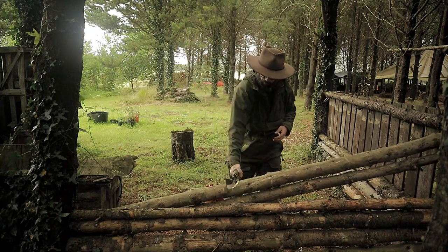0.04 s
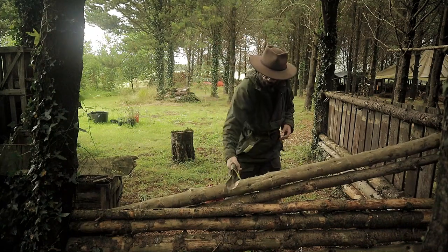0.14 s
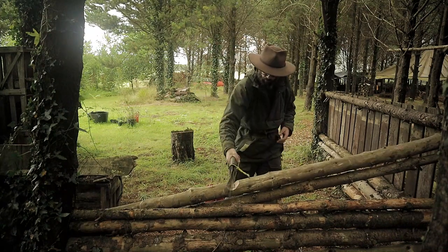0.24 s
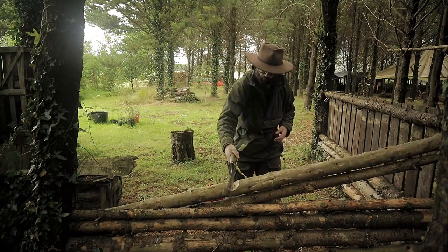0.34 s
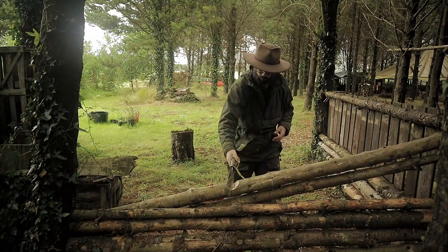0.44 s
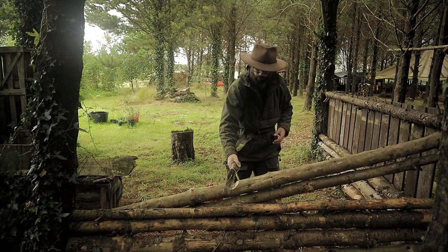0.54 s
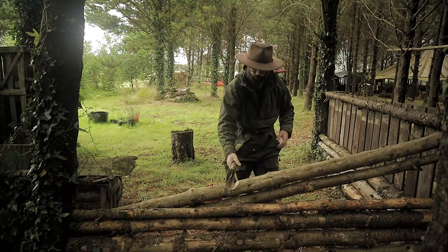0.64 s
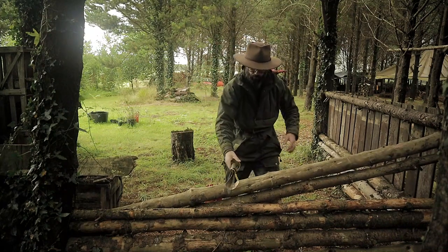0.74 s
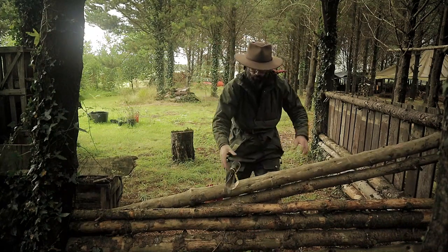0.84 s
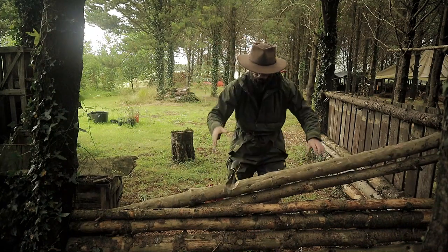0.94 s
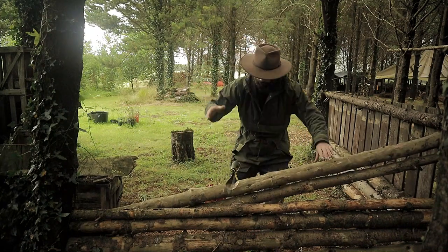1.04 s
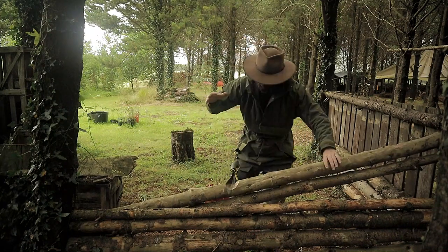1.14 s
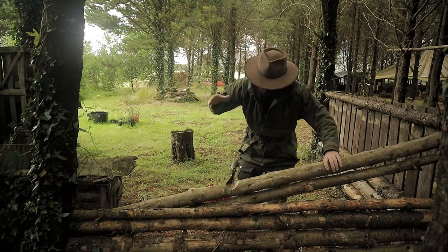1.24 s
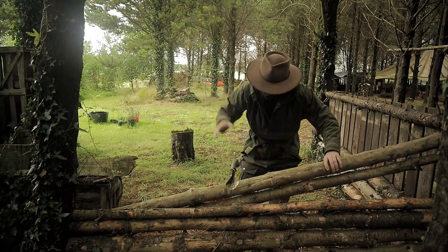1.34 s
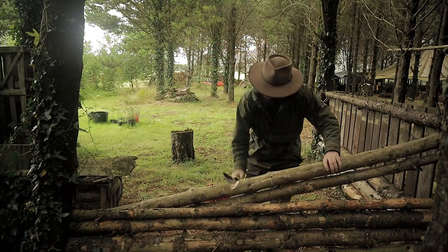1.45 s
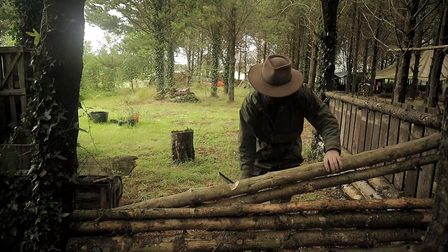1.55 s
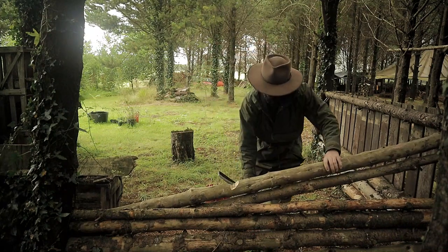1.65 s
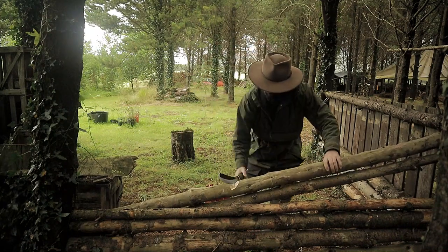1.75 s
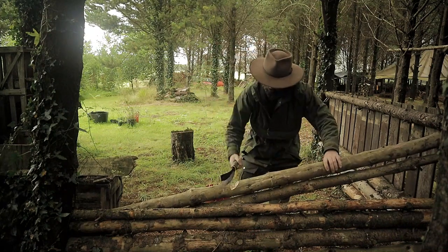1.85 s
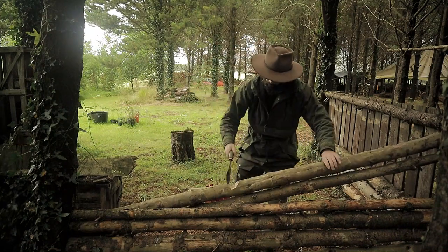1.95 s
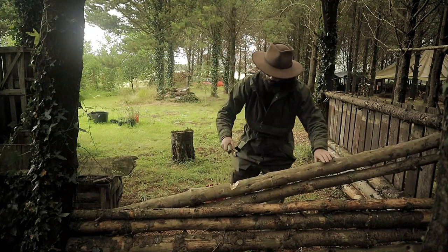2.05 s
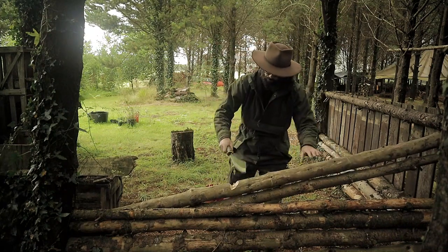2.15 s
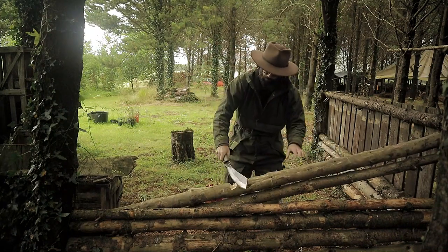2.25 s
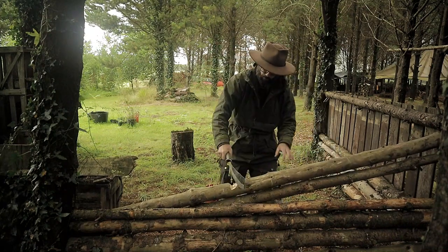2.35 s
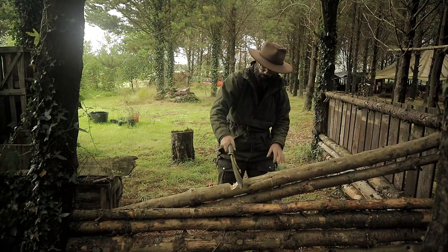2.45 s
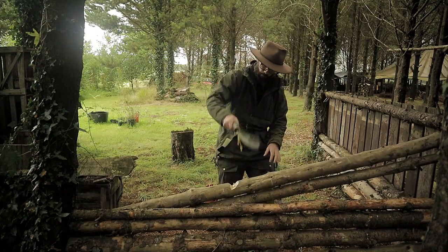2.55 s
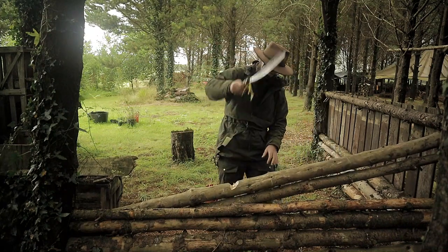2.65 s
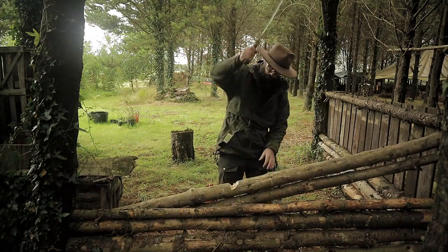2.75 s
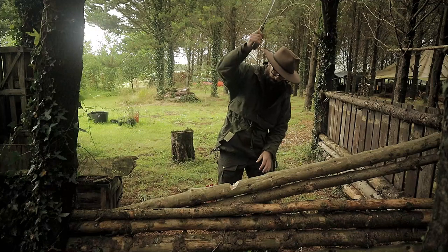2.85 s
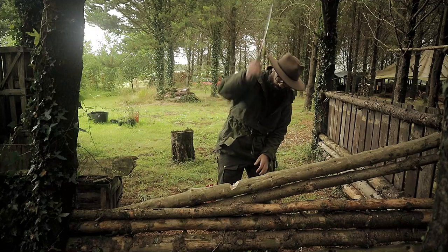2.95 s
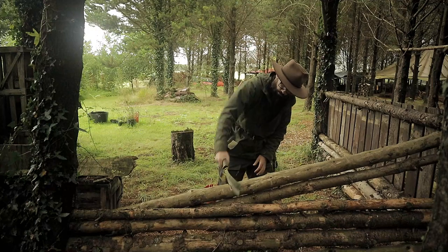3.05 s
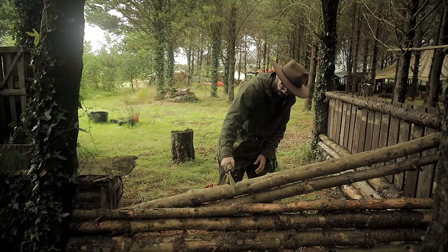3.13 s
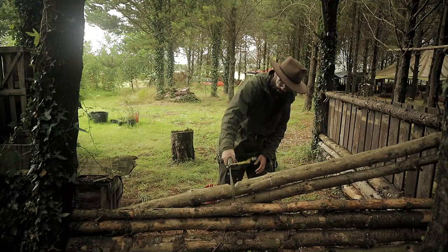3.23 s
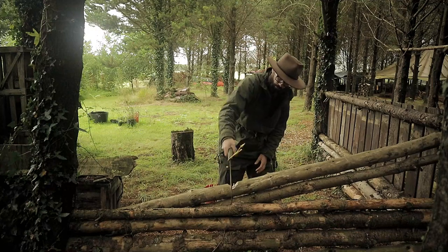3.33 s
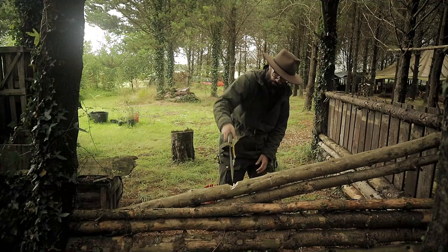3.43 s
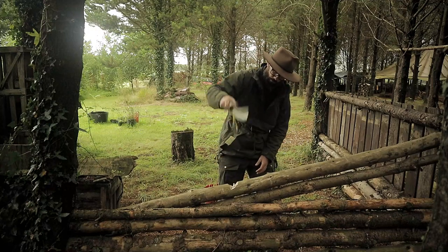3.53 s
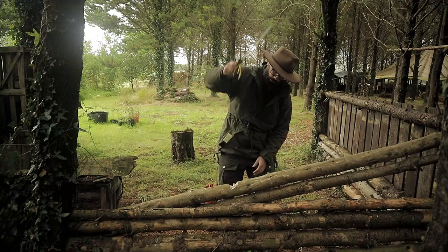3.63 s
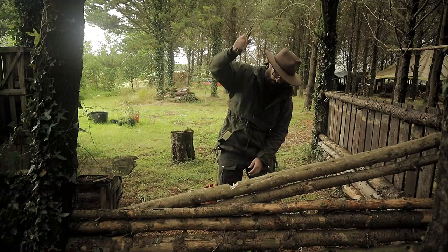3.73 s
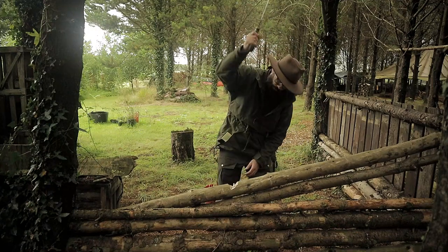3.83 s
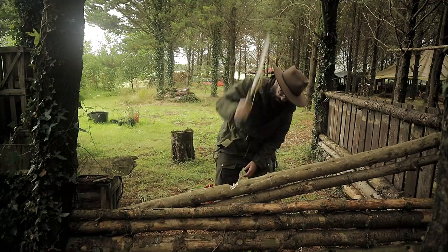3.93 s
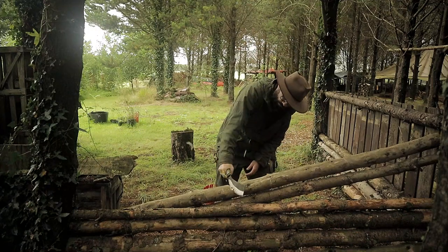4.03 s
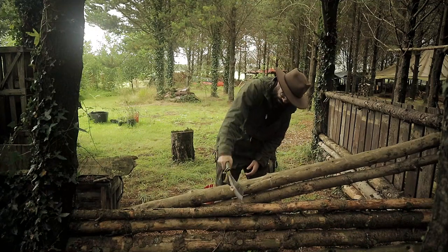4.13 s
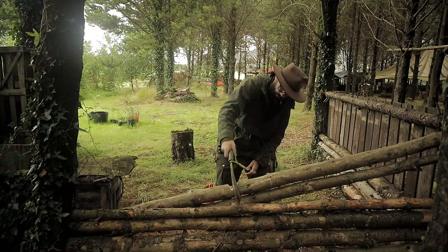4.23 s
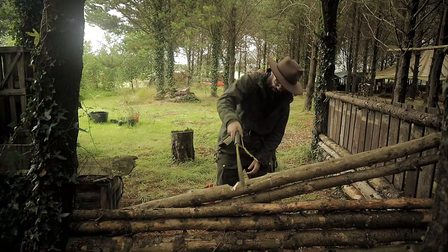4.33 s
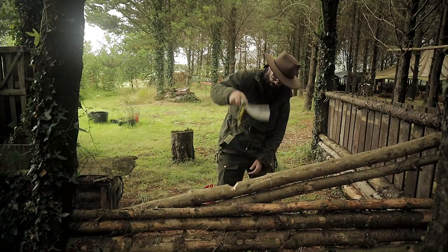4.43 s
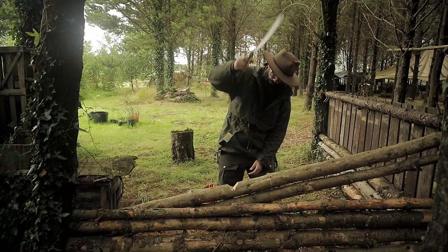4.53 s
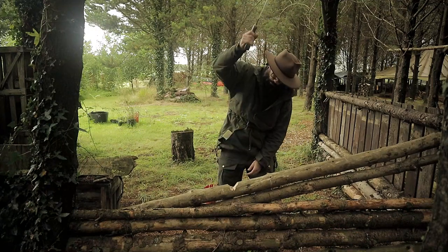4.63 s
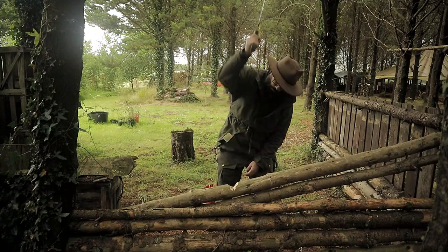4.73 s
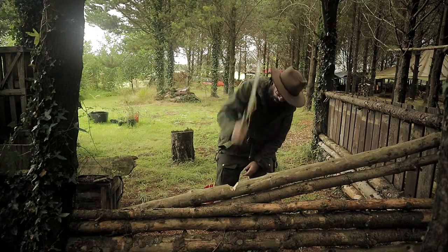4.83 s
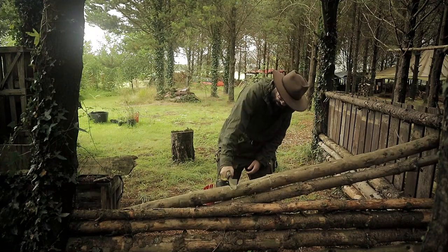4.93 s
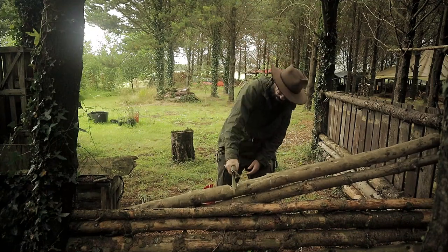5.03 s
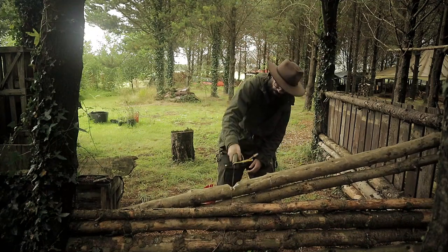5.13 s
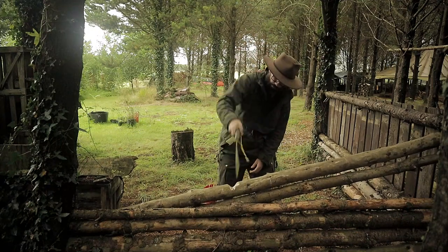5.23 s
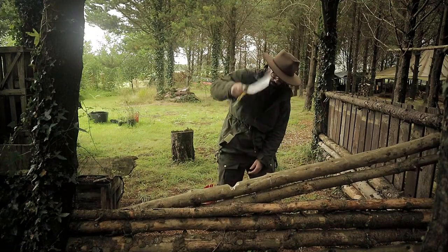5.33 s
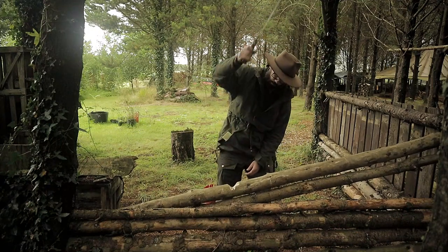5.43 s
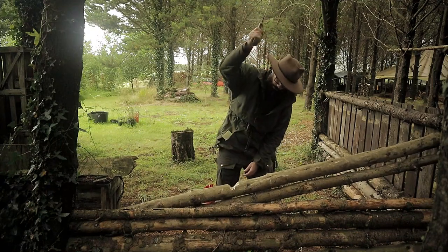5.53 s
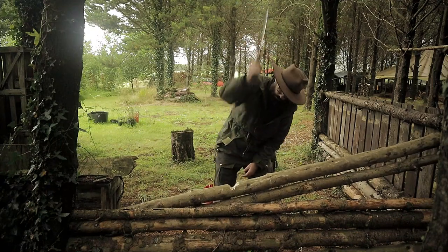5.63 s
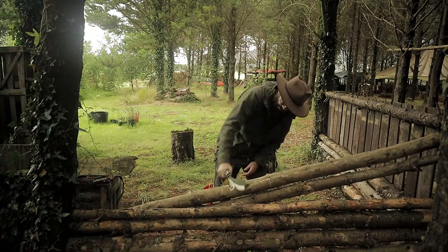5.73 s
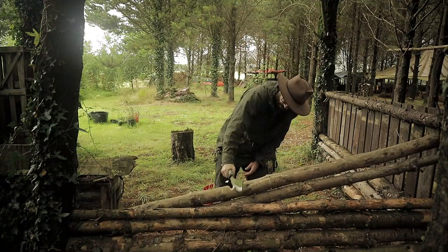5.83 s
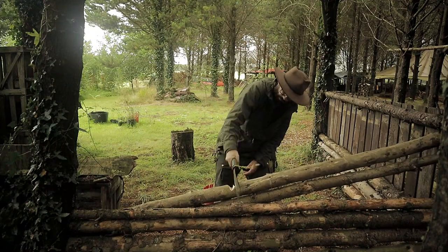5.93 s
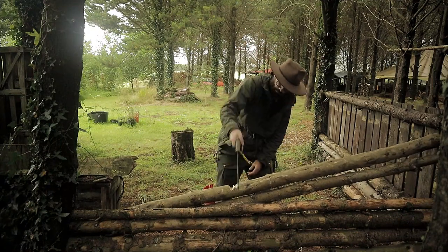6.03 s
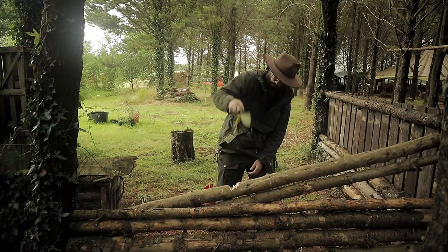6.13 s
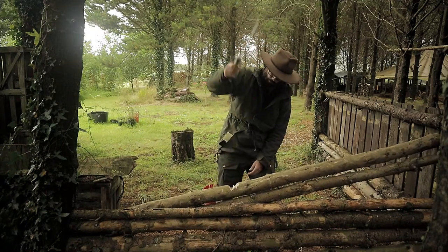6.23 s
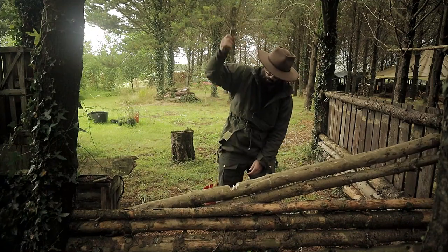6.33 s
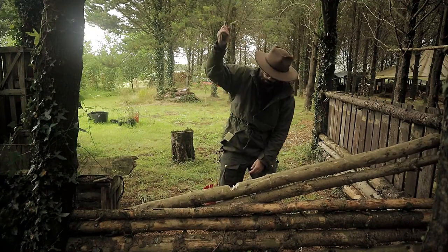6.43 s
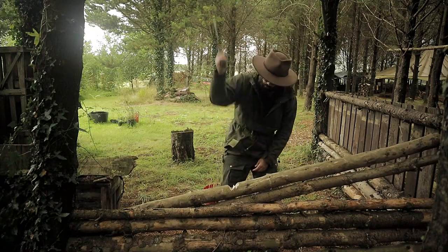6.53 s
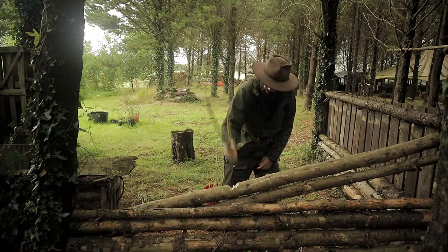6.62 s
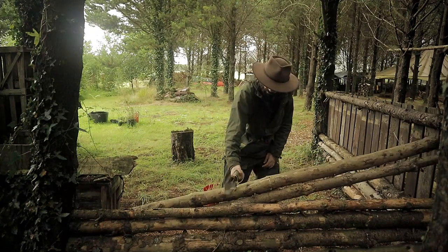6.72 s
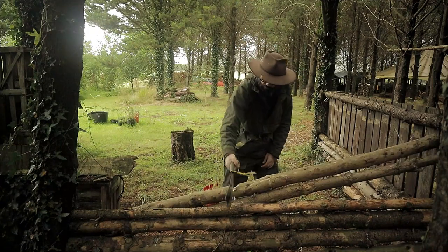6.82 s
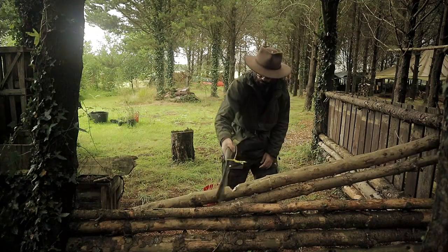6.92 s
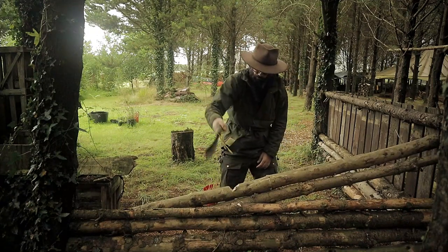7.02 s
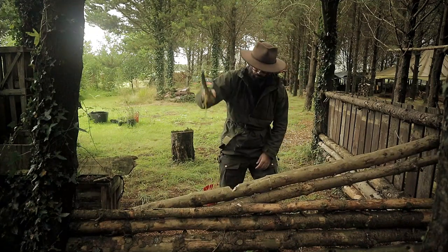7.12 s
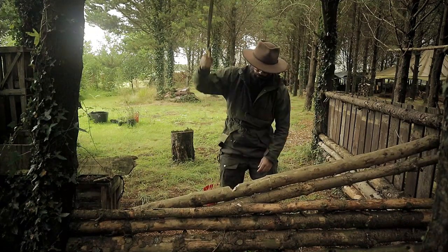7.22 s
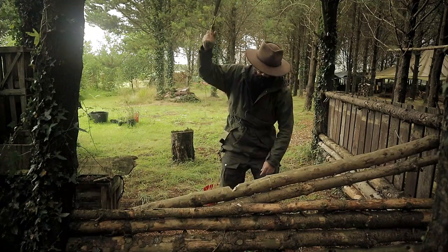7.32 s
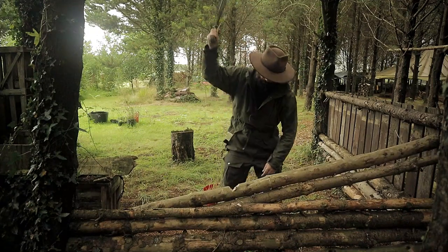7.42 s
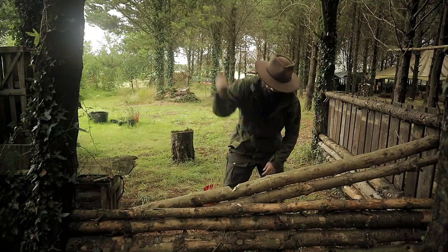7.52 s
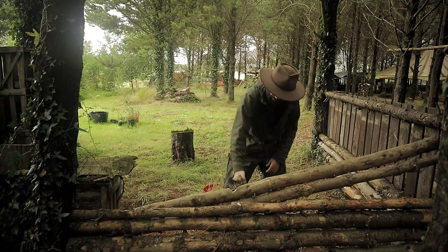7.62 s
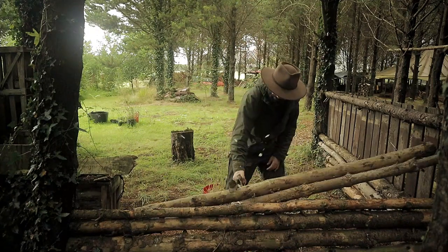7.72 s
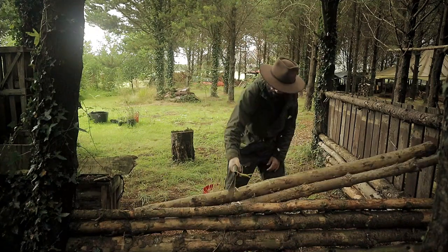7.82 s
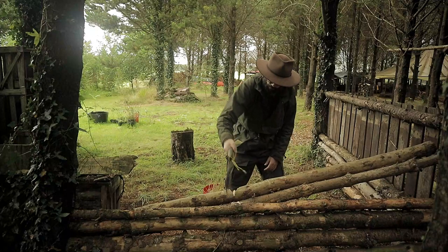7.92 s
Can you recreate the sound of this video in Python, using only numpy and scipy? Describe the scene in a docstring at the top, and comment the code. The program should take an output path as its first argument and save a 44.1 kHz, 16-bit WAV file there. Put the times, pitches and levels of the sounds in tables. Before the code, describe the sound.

Sharp, woody knife chops crack on a log fence in a quiet conifer clearing, with a short forest echo and faint distant birds.

```python
"""In a quiet clearing among conifers, a heavy knife chops seven times into a pole lying on a log fence.
Each blow sums noise bursts for the breaking fibres, damped modes for the ringing pole and blade, and a
low rumble and sway for the fence; echoes decaying band by band return it from the trunks, and strong
peaks clip at the microphone. Between blows light knocks excite the same pole, twigs and chips tick as
short noise bursts, steps press the ground, and small birds call far off as gliding sines over still air."""
import sys
import numpy as np
from scipy import signal
from scipy.fft import rfft, irfft, next_fast_len
from scipy.io import wavfile

SR = 44100
rng = np.random.default_rng(int(sys.argv[2]) if len(sys.argv) > 2 else 0)


def dump(signal):
    """Clip the signal to [-1, 1] and save it as 16-bit WAV at the path in sys.argv[1]."""
    limited = np.clip(np.atleast_2d(signal).T, -1, 1)
    pcm = np.round(limited * 32767).astype(np.int16)
    wavfile.write(sys.argv[1], SR, pcm)


N = 351477
AGE = np.arange(int(1.2 * SR)) / SR   # time since the onset of one sound, s

# The chops, levels relative to a usual blow. Each row: start in seconds, weight in dB, place along the
# notch from 0 (near) to 1 (far), splintering in dB, blade ring in dB, fence shudder in dB.
CHOP_BLOWS = [(0.1149, 3.5, 0.1, -7.5, -23.5, -1.5), (3.1506, 0.5, 0.25, -4.5, -21.5, 0),
              (4.0932, -3, 0.04, 1.5, -16.5, 3), (4.9755, 1.5, 0.93, 6, -15.5, 4),
              (5.8303, -4, .95, 7.5, -4.5, 4.5), (6.7496, 3, 0.21, -5.5, -27.5, 6.5),
              (7.7054, 2, 0.24, 1, -34, 4)]
# Spectrum of the dull crack of breaking fibres. Each row: frequency in Hz, relative density in dB per Hz.
CRACK_SPECTRUM = [(200, -13), (700, -7), (1300, -0.5), (2500, -3), (3600, -9), (5500, -20.5), (16000, -40)]
# Spectrum of the fine splintering. Each row: frequency in Hz, relative density in dB per Hz.
SPLINTER_SPECTRUM = [(500, -23.5), (2000, -11), (4400, 4), (6200, -8.5), (7500, 0), (9400, -2.5),
                     (12500, -11.5), (16000, -20.5)]
# Return from the trees. Each row: frequency in Hz, relative level in dB, early decay as t60 in seconds.
FOREST_ECHO = [(60, -44, .5), (300, -33, 0.28), (590, -23, 0.49), (1160, -19, 0.69), (2480, -23.5, 0.39),
               (4470, -27, 0.39), (8200, -33, 0.34), (11000, -39, 0.22), (16000, -52.5, .15)]


def from_db(db):
    """Level to amplitude: 20 dB is a factor of ten."""
    return 10 ** (np.asarray(db) / 20)


def fade(t60):
    """Exponential damping: the amplitude falls by 60 dB in t60 seconds."""
    return np.exp(-np.log(1000) * AGE / t60)


def add(track, s, sound):
    """Superposition: sounds starting at time s add linearly to the track."""
    start = int(round(s * SR))
    track[start:start + len(sound)] += sound[:max(N - start, 0)]


def at_hz(points, hz, axis=1):
    """Interpolation of one table column on a logarithmic frequency axis."""
    points = np.array(points)
    return np.interp(np.log(np.maximum(hz, 1)), np.log(points[:, 0]), points[:, axis])


def noise(spectrum, size=len(AGE)):
    """Spectral shaping: white noise is weighted by frequency and scaled to rms 1."""
    padded = next_fast_len(size)
    colour = from_db(at_hz(spectrum, np.fft.rfftfreq(padded, 1 / SR)))
    white = rng.standard_normal(padded)
    x = irfft(rfft(white) * colour, padded)[:size]
    return x / x.std()


def burst(spectrum, envelope):
    """Energy normalisation: a noise burst carries just the energy of its envelope."""
    x = noise(spectrum) * envelope
    return x * np.sqrt(np.sum(envelope ** 2) / np.sum(x ** 2))


def ring(hz, db, t60):
    """Modal vibration: one struck mode is an exponentially damped sine."""
    return from_db(db) * np.sin(2 * np.pi * hz * AGE) * fade(t60)


def pressed(x, contact_ms):
    """Contact time: a longer force pulse excites less treble, here a two-pole low-pass filter."""
    r = np.exp(-2 * np.pi / (contact_ms * 1e-3 * SR))
    return signal.lfilter([(1 - r) ** 2], [1, -2 * r, r * r], x)


def chops(shove_db=2.5, crack_db=-10, splinter_db=-4, tearing_db=-32, rebound_s=.0033, rebound_db=-4,
          shudder_db=-25.5, sway_db=3, settling_db=1.0):
    """Impact excitation: crack, shove, ring and fence start together, and the pole slaps the log below."""
    ring_follows = .58   # dB of wooden ring per dB of weight
    far_crack_db = 6   # more crack at the far end of the notch
    out = np.zeros(N)
    for blow, (s, weight, place, splinter, steel, fence) in enumerate(CHOP_BLOWS):
        wood = from_db(ring_follows * weight) * pole(place, detune=0.017, uneven_db=3.37)
        push = from_db(shove_db + weight) * shove(360, 0.013)

        crack = from_db(crack_db + far_crack_db * place)
        fibres = crack * burst(CRACK_SPECTRUM, bite(0.0033) + 0.17 * fade(0.033))
        tearing = from_db(splinter_db) * bite(0.0019) + from_db(tearing_db) * fade(0.055)
        fibres += from_db(splinter) * burst(SPLINTER_SPECTRUM, tearing)

        logs = from_db(shudder_db + fence) * shudder(0.015, .34)
        logs += from_db(sway_db - settling_db * blow) * sway()   # less sway with each blow
        add(out, s, pressed(wood + push, 0.3) + fibres + logs)

        slap = crack * burst(CRACK_SPECTRUM, bite(0.0034))
        add(out, s + rebound_s, from_db(rebound_db) * slap)
    return out


def bite(bite_s):
    """Fracture: fibres break while the edge sinks in, then stop quickly along a Gaussian."""
    onset = 1 - np.exp(-AGE / 0.00078)
    return onset * np.exp(-(AGE / bite_s) ** 2)


def pole(place, detune, uneven_db):
    """Modal excitation: the striking point weights the modes, each varied a little in pitch and level."""
    # Each row: nominal frequency in Hz, level struck mid-notch in relative dB, t60 in seconds,
    # dB gained from the near end of the notch to the far end.
    pole_modes = [(183, -26, 0.017, 4), (185, -21, 0.011, 2), (344, -20, 0.053, -1),
                  (334.6, -14.5, 0.083, -0.5), (457, -13.5, 0.063, -10), (504, -17, 0.12, -8.5),
                  (557, -21, 0.054, -4.5), (720, -11, 0.077, -8.5), (819.7, -14, 0.058, -11.5),
                  (972, -11, 0.091, 10), (1040, -17.5, .06, 0), (1204, -7, 0.033, -14),
                  (1446, -20, 0.095, 3.5), (1860, -15.5, 0.05, 7), (2226, -18, 0.055, 1.5),
                  (2660, -21, 0.018, 8), (3570, -23.5, 0.025, 5), (4440, -20.5, 0.032, 6)]
    out = 0
    for k, (hz, db, t60, far_db) in enumerate(pole_modes):
        pull, luck = rng.standard_normal(2)
        level_db = db + far_db * (place - .5) + uneven_db * luck
        out = out + (-1) ** k * ring(hz * (1 + detune * pull), level_db, t60)   # alternating polarity
    return out


def shove(push_hz, push_t60):
    """Damped oscillator: the pole is pushed aside and springs back in one heavy swing of pressure."""
    return ring(push_hz, 0, push_t60)


def shudder(rise_s, t60):
    """Energy spreading: the blow builds up in the stacked logs, which rumble against each other."""
    # Each row: frequency in Hz, relative density in dB per Hz.
    fence_spectrum = [(25, -13.5), (60, -3), (95, 3), (165, 1), (250, -5.5), (420, -8), (650, -21),
                      (1500, -42), (16000, -88)]
    build_up = (1 - np.exp(-AGE / rise_s)) ** 2
    return burst(fence_spectrum, build_up * fade(t60))


def sway():
    """Low-frequency resonance: the whole fence rocks in a few slow modes."""
    # Each row: frequency in Hz, relative level in dB, t60 in seconds.
    sway_modes = [(36, -45.5, 1.7), (60.8, -52, 2.6), (95, -43, 0.69), (166, -36.5, 0.5)]
    modes = sum(ring(*mode) for mode in sway_modes)
    return modes * (1 - np.exp(-AGE / 0.037))


def blade(shiver_db=-31.5, shiver_t60=0.38, tones_db=-26, swish_db=-53, swing_s=0.068):
    """Flow noise and plate modes: the blade swishes through the air and sings briefly as it lands."""
    # Dense cluster of close modes in thin steel. Each row: frequency in Hz, relative density in dB per Hz.
    shiver_spectrum = [(1000, -52), (4500, -28.5), (5100, 0), (5300, 0), (5800, -6.5), (6300, -17.5),
                       (7400, -14), (9000, -28), (16000, -50)]
    # Clearest tones of the steel. Each row: frequency in Hz, relative level in dB, t60 in seconds.
    steel_modes = [(4990, -3, 0.27), (5320, -3.5, 0.19), (5530, -6, 0.24), (5670, -8.5, 0.28),
                   (5630, -5.5, 0.31), (6940, -13, 0.43), (7670, -7.5, 0.17)]
    swish_spectrum = [(60, -10.0), (400, 0), (900, -4), (2000, -17.5), (16000, -44.5)]   # Hz, dB per Hz
    out = np.zeros(N)
    swish = np.exp((np.minimum(AGE, swing_s) - swing_s) / 0.057) * (AGE < swing_s)   # grows, then stops
    tones = from_db(tones_db) * sum(ring(*mode) for mode in steel_modes)
    for s, weight, place, splinter, steel, fence in CHOP_BLOWS:
        add(out, s - swing_s, from_db(swish_db) * swish * noise(swish_spectrum))
        shiver = from_db(shiver_db) * burst(shiver_spectrum, fade(shiver_t60))
        add(out, s, from_db(steel) * (tones + shiver))
    return out


def knocks(ring_db=-1, crack_db=5, splinter_db=6, shudder_db=-20, scrape_db=-15, sway_db=20,
           clink_hz=4300, clink_db=-11):
    """Light contact: blade and hand ring the same pole with little weight; the blade clinks and scrapes."""
    # Each row: start in seconds, relative level in dB, place along the notch from 0 to 1,
    # contact time in milliseconds, relative fence shudder in dB.
    touches = [(1.496, -28, 0.47, 0.55, -1), (1.504, -34.5, 0.6, 0.25, 13.5),
               (1.5307, -27, 0.8, 0.092, 12.5), (1.614, -32.5, 0.25, 0.46, 14),
               (1.642, -31, 0.53, 0.61, 15.5), (2.3104, -23.5, 0.9, 0.42, 3)]
    # a softer contact breaks fewer fibres: dB lost per ms of contact
    crack_loss_db_per_ms, splinter_loss_db_per_ms = 47, 67
    out = np.zeros(N)
    contact = bite(0.006) + from_db(scrape_db) * fade(0.187)
    for s, db, place, contact_ms, fence in touches:
        crack = crack_db - crack_loss_db_per_ms * contact_ms
        splinter = splinter_db - splinter_loss_db_per_ms * contact_ms
        wood = from_db(ring_db) * pole(place, detune=0.045, uneven_db=0.0)
        fibres = from_db(crack) * burst(CRACK_SPECTRUM, contact)
        fibres += from_db(splinter) * burst(SPLINTER_SPECTRUM, contact)
        rocking = from_db(sway_db) * sway() * fade(0.68)
        logs = from_db(shudder_db + fence) * (pressed(shudder(0.0038, 0.34), 3.2) + rocking)
        clink = ring(clink_hz, clink_db + crack, 0.088)
        add(out, s, from_db(db) * (pressed(wood, contact_ms) + fibres + logs + clink))
    return out


def litter(twig_db=-3, twig_t60=0.031, count=2):
    """Transient radiation: twigs and landing chips give short ticks, boots on soft ground dull thuds."""
    # Clearest twigs and chips. Each row: start in seconds, relative level in dB, treble against middle in dB.
    snaps = [(0.2123, -35.5, -12), (1.592, -44.5, -2.5), (3.2703, -42, -5), (3.5987, -44.5, -29),
             (4.4301, -52, -16.5), (4.5067, -51, -0.5), (4.6144, -44.5, -21), (4.6663, -47, -5),
             (5.5317, -46.5, -11.5), (7.2548, -46, -4), (7.7615, -26, -25), (7.7855, -28.5, -20.5)]
    # Middle of a snap. Each row: frequency in Hz, relative density in dB per Hz.
    twig_middle = [(300, -9), (1200, 7.5), (2500, 5.5), (4700, -1), (6500, -20), (16000, -21)]
    # Treble of a snap. Each row: frequency in Hz, relative density in dB per Hz.
    twig_treble = [(2000, -17), (5000, 0.5), (9000, -3), (16000, -18)]
    # Steps on the soft ground. Each row: start in seconds, relative level in dB.
    footfalls = [(0.612, -58.5), (1.96, -71), (5.29, -53), (7.24, -59.5)]
    # Spectrum of a step. Each row: frequency in Hz, relative density in dB per Hz.
    step_spectrum = [(30, 5.5), (150, 5.5), (300, -4.5), (600, -9.5), (1500, -24.5), (16000, -48)]
    # small chips land a little after every chop: mean flight and its standard deviation, then relative levels
    flight_s, spread_s, chip_db, chip_treble_db = 0.4, 0.044, -54.5, -6
    out = np.zeros(N)
    chips = []
    for s, *_ in CHOP_BLOWS:
        for late in rng.standard_normal(count):
            chips.append((s + flight_s + spread_s * late, chip_db, chip_treble_db))
    snap = fade(twig_t60)
    for s, db, treble in list(snaps) + chips:
        tick = burst(twig_middle, snap) + from_db(treble) * burst(twig_treble, snap)
        add(out, s, from_db(db + twig_db) * tick)
    press = AGE / 0.0046 * np.exp(1 - AGE / 0.014)
    for s, db in footfalls:
        add(out, s, from_db(db) * burst(step_spectrum, press))
    return out


def echoes(table, delay_s, build_s, tint=None, linger=0.19):
    """Diffuse reverberation: dense echoes build up after a delay and decay by band, the last half as fast."""
    edges = np.geomspace(40, 18000, 17)
    onset = 1 - np.exp(-np.maximum(AGE - delay_s, 0) / build_s)
    white, out = rng.standard_normal((2, len(AGE))), 0
    for k, (low, high) in enumerate(zip(edges, edges[1:])):
        hz = np.sqrt(low * high)
        t60 = at_hz(table, hz, axis=2)
        band_filter = signal.butter(2, [low, high], "band", fs=SR, output="sos")
        band = signal.sosfilt(band_filter, white[k % 2])   # neighbouring bands use separate noise
        band = band * onset * (fade(t60) + linger * fade(2 * t60))
        db = at_hz(table, hz) + (at_hz(tint, hz) if tint else 0)
        # energy in proportion to bandwidth
        out = out + band * from_db(db) * np.sqrt(2 * (high - low) / SR / np.sum(band ** 2))
    return out


def forest(return_db=18.5):
    """Multiple scattering: trunks return each crack as a wash, fuller with weight, brighter with splinters."""
    forest_follows = 1.7   # dB of return in the middle per dB of weight
    splinter_returns = 0.93   # dB of treble in the return per dB of splintering
    out = np.zeros(N)
    for s, weight, place, splinter, steel, fence in CHOP_BLOWS:
        wash = forest_follows * weight
        tint = [(400, weight), (1000, wash), (2400, wash), (5000, splinter_returns * splinter)]   # Hz, dB
        add(out, s, from_db(return_db) * echoes(FOREST_ECHO, .028, 0.026, tint, linger=.3))
    return out


def birds(waver_hz=120):
    """Frequency modulation: evenly spaced thin whistles slide down with a quick random waver."""
    # Each row: start in seconds, phrase length in seconds, nominal pitch in Hz, relative level in dB.
    phrases = [(.49, .06, 4120, -69), (4.346, .31, 3970, -69.5), (5.254, .19, 7580, -69),
               (5.617, .19, 3900, -64), (6.241, .45, 7390, -67), (6.326, .35, 8180, -71.5),
               (7.047, .06, 2900, -61), (7.09, .06, 4110, -58.5)]
    note_s, note_every_s = 0.043, 0.12
    note_fall, note_scatter = 0.044, .02   # shares of the pitch
    waver_spectrum = [(20, 5.5), (120, 5.5), (500, -47), (16000, -100.5)]   # Hz, dB per Hz
    out = np.zeros(N)
    note, note_age = np.divmod(AGE, note_every_s)
    part = np.minimum(note_age / note_s, 1)   # progress through the note
    for s, length, pitch_hz, db in phrases:
        offset = note_scatter * rng.standard_normal(len(AGE))[note.astype(int)]   # one draw per note
        hz = pitch_hz * (1 + offset - note_fall * (part - .5)) + waver_hz * noise(waver_spectrum)
        swell = np.sin(np.pi * part) * (note * note_every_s < length)
        phase = 2 * np.pi * np.cumsum(hz) / SR
        add(out, s, from_db(db) * swell * np.sin(phase))
    return out


def still_air(air_db=-62.5):
    """Ambient noise: the still forest air is a steady, faint noise strongest in the bass."""
    # Each row: frequency in Hz, relative density in dB per Hz.
    air_spectrum = [(15, -29), (25, -0.5), (48, 3.5), (127, -4.5), (301, -5.5), (840, -8.5), (1100, -10),
                    (1480, -15), (1610, -14), (2760, -18.5), (4740, -19), (5570, -25.5), (7310, -24),
                    (16000, -29)]
    return from_db(air_db) * noise(air_spectrum, size=N)


def scene(trees_db=-14, far_db=24.5, direct_call_db=-1.0):
    """Direct and reverberant field: near sounds scatter off ground and fence, birds mostly off the trees."""
    # Scatter from ground and fence. Each row: frequency in Hz, relative level in dB, early t60 in seconds.
    near_echo = [(100, -18.5, 0.049), (490, -11, 0.15), (790, -16.5, 0.39), (1211, -16.5, 0.081),
                 (3030, -19, 0.13), (8000, -23.5, 0.19), (16000, -25, 0.065)]
    direct = chops() + blade() + knocks() + litter()
    close = direct + signal.fftconvolve(direct, echoes(near_echo, .006, 0.0016))[:N]
    calls = birds()
    into_trees = from_db(trees_db) * close + from_db(far_db) * calls
    trees = signal.fftconvolve(into_trees, echoes(FOREST_ECHO, .02, .02))[:N]
    return (close + forest() + trees + from_db(direct_call_db) * calls + still_air())[None]


def record(dry, top=0.99, low_cut_hz=24, cutoff_hz=16000):
    """Limited bandwidth and overload: the microphone sheds deep bass, clips peaks flat and loses the top."""
    thinned = signal.sosfilt(signal.butter(1, low_cut_hz, "high", fs=SR, output="sos"), dry)
    clipped = np.clip(thinned, -top, top)
    return signal.sosfilt(signal.ellip(10, .2, 80, cutoff_hz, fs=SR, output="sos"), clipped)


dry = scene()
out = record(dry)
dump(out)
```